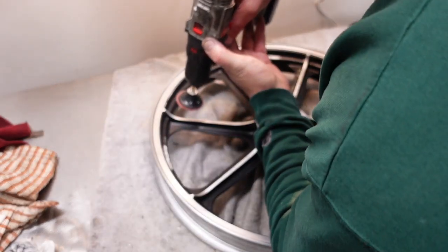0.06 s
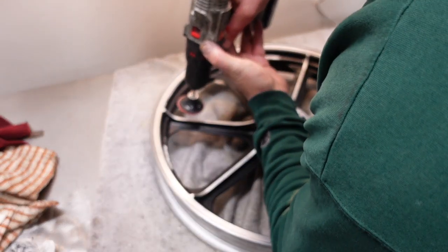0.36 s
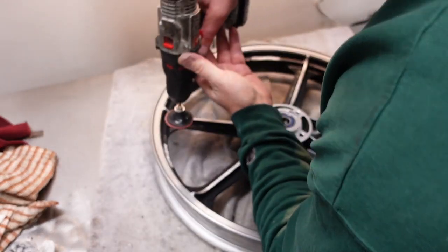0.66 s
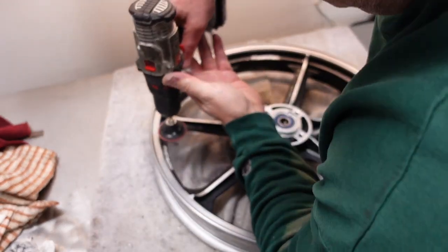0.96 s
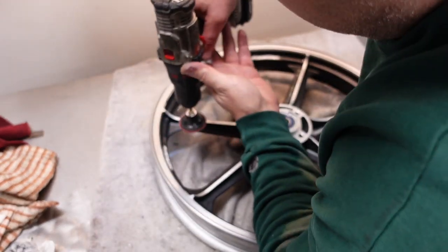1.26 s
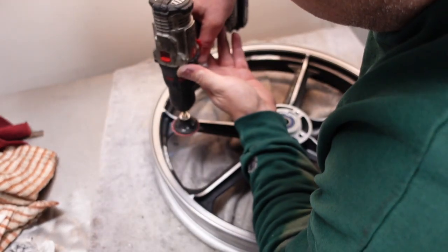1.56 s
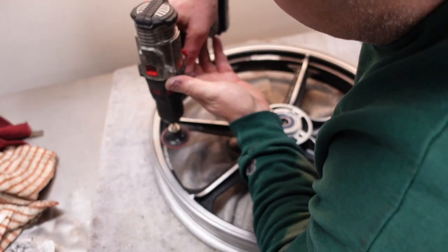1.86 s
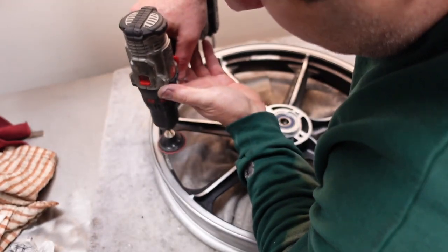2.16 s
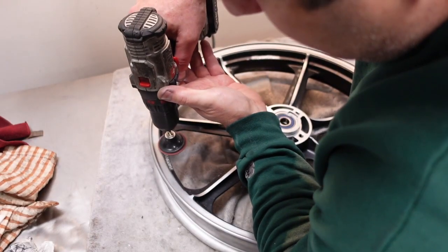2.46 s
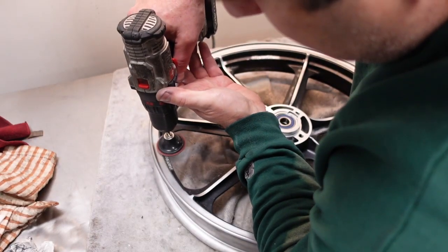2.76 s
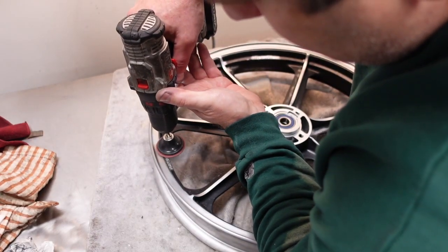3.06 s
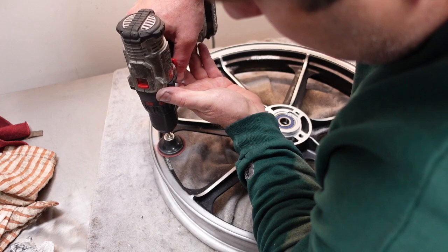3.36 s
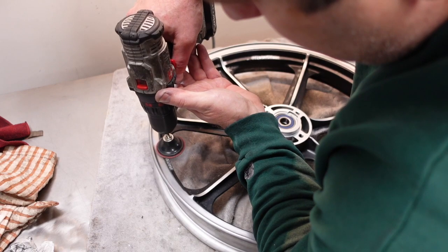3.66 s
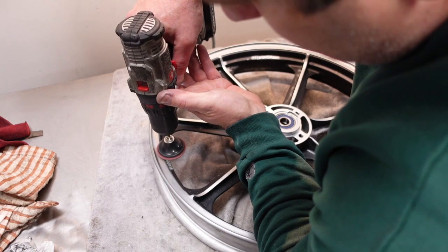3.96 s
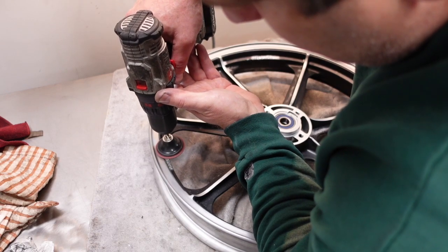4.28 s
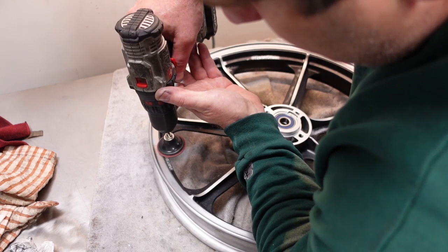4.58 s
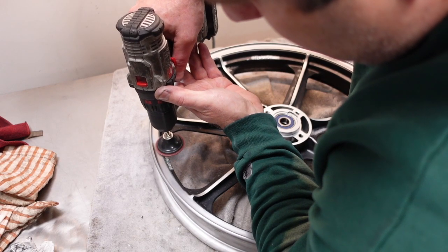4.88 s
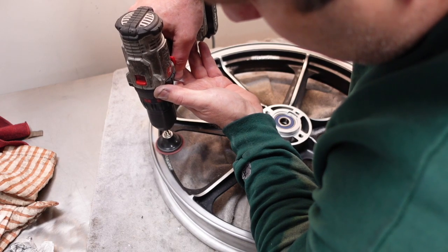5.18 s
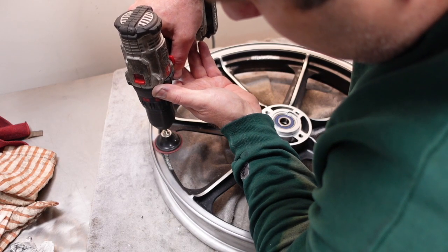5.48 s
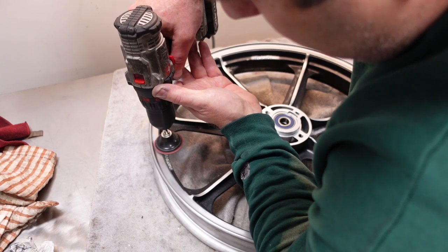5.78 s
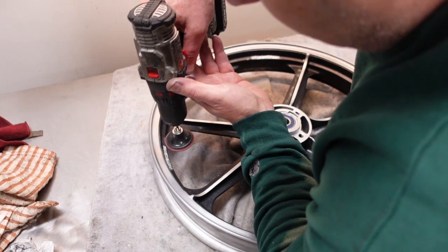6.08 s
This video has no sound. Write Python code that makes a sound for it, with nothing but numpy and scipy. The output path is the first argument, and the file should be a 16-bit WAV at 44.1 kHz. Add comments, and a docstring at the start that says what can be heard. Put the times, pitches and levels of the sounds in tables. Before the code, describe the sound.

A sleeve rustles faintly, then a trigger clicks and a cordless grinder turns slowly with a high electronic beep and a light gear rattle. It stops briefly, beeps again and winds up fast to a loud, high whine over rattling gears. The pitch sags slightly as its small disc sands a metal wheel with a faint low rumble. The tool is close, with a short workshop echo.

```python
"""A cordless die grinder beeps, crawls, stops, then whines at full speed, sanding an alloy wheel close by.
A sleeve rustles first. At half trigger the speed controller chops the current and the windings beep.
At full speed the cooling fan whines over rattling gears; the small disc rumbles on the wheel and the
motor sags as it is pressed down. Hands, trigger and gear slack knock, with a short workshop echo."""
import sys
import numpy as np
from scipy import signal
from scipy.fft import rfft, irfft, next_fast_len
from scipy.io import wavfile
from scipy.ndimage import map_coordinates

SR = 44100
rng = np.random.default_rng(int(sys.argv[2]) if len(sys.argv) > 2 else 0)


def persist_wave(psi):
    """Save psi, clipped to +-1, as 16-bit WAV."""
    counts = np.round(np.clip(psi, -1, 1) * 32767).astype(np.int16)
    wavfile.write(sys.argv[1], SR, np.atleast_2d(counts).T)


N = 274743
T = np.arange(N) / SR
CRAWL_HZ, FREE_HZ = 42.96, 339  # motor turns per second

# current chopping per trigger pull: start_s, end_s, start_duty, end_duty, harmonic2_db, harmonic3_db
PULLS = [(0.919, 1.464, 0.05, 0.19, 0.5, -22), (1.827, 2.047, 0.08, 0.62, -18, -27)]
# tool and wheel resonances: centre_hz, width_hz, gain_db
RESONANCES = [(612, 48, 3.5), (757, 50, 8), (1296, 120, 5.5), (1550, 640, 6.5), (1940, 99, 3.5),
              (2490, 210, 9), (2864, 210, 7.5), (3310, 164, 5), (3837, 240, 5.5), (5710, 300, 3.5),
              (7370, 330, 5.5), (8670, 380, 2), (12000, 510, 3.5)]


def amp(db):
    """Decibels to gain."""
    return 10 ** (np.asarray(db) / 20)


def unit(x):
    """Scale to rms 1."""
    return x / np.sqrt(np.mean(x ** 2) + 1e-20)


def curve(rows):
    """A (time_s, value) table at every sample."""
    return np.interp(T, *np.transpose(rows))


def gate(start_s, end_s=np.inf):
    """1 between two times, with 3 ms edges."""
    return np.clip(np.minimum(T - start_s, end_s - T) / .003, 0, 1)


def spectrum_db(points, hz):
    """A (freq_hz, level_db) table interpolated over log frequency."""
    freq_hz, level_db = np.transpose(points)
    return np.interp(np.log(hz + 1), np.log(freq_hz + 1), level_db)


def peaks_db(peaks, x):
    """Sum of resonance humps."""
    return sum(db / (1 + (2 * (x - centre) / width) ** 2) for centre, width, db in peaks)


def shaped(x, points, phase=1):
    """Filter by a spectrum table; phase=1j adds 90 degrees."""
    size = next_fast_len(N)
    gain = amp(spectrum_db(points, np.fft.rfftfreq(size, 1 / SR)))
    return irfft(phase * rfft(x, size) * gain, size)[:N]


def noise(points):
    """Steady coloured noise, rms 1."""
    return unit(shaped(rng.standard_normal(N), points))


def drift(rate_hz):
    """Smooth random wander, rms 1."""
    coarse = map_coordinates(rng.standard_normal(4096), [T[::32] * rate_hz + 3], order=3, mode="wrap")
    return unit(coarse).repeat(32)[:N]


def tone(turns, order):
    """Sine at a multiple (order) of a rotation, rms 1."""
    return np.sqrt(2) * np.sin(2 * np.pi * (order * turns + rng.random()))


def powered():
    """1 while current flows: through the first pull, and from the second on."""
    return gate(*PULLS[0][:2]) + gate(PULLS[1][0])


def air(level_db):
    """Steady workshop background noise."""
    # background spectrum: freq_hz, density_db
    spectrum = [(15, -71), (25, -45), (140, -9), (274, 1), (537, -5), (782, -1.5), (895, -8.5), (1530, -14),
                (2300, -12), (2560, -15.5), (4040, -14), (4380, -11.5), (5580, -23), (10600, -27),
                (15500, -38)]
    return amp(level_db) * noise(spectrum)


def room(x, t60_s=.51):
    """Short, scattered workshop echo."""
    t = np.arange(SR // 3) / SR
    tail = rng.standard_normal(len(t)) * amp(-60 * t / t60_s) * (t > .003)
    return signal.oaconvolve(x, tail / np.linalg.norm(tail))[:N]


def sleeve(grain_db=1.0):
    """Cloth slides in soft swells as the arms place the tool."""
    # cloth spectrum: freq_hz, density_db
    cloth = [(600, -23), (1200, -6), (2200, -2), (3200, -6), (4500, 0), (6000, -5), (8000, -20),
             (11000, -35)]
    # arm movements: peak_s, rise_s, fall_s, rub_db, fizz_db
    rustles = [(0.0, .05, 0.09, -52, -84), (0.36, 0.37, 0.38, -60, -67.5), (0.68, 0.16, 0.11, -58, -63)]
    rub = noise(cloth)
    fizz = noise([(3000, -40), (7500, 1), (10500, 0), (15500, -9)])
    out = np.zeros(N)
    for peak_s, rise_s, fall_s, rub_db, fizz_db in rustles:
        swell = np.exp(-((T - peak_s) / np.where(T < peak_s, rise_s, fall_s)) ** 2)
        out += swell * (amp(rub_db) * rub + amp(fizz_db) * fizz)
    return out * amp(grain_db * drift(121))


def wheel(ring_hz=1685, width_hz=60):
    """One narrow wheel resonance, rubbed by the resting disc."""
    # ring envelope: time_s, level_db
    envelope = [(1.6, -64), (1.66, -55.5), (1.82, -58), (1.9, -72)]
    ring = signal.lfilter(*signal.iirpeak(ring_hz, ring_hz / width_hz, SR), rng.standard_normal(N))
    return gate(envelope[0][0], envelope[-1][0]) * amp(curve(envelope)) * unit(ring)


def knocks():
    """Short bursts ring in the tool and wheel."""
    # hand, trigger, gear slack and disc knocks: start_s, level_db, centre_hz, width_oct, t60_s
    hits = [(0.584, -53, 118, .4, .15), (0.593, -43.5, 560, 0.27, .08), (0.622, -44, 3800, 0.6, .045),
            (0.80, -54, 111, 0.36, .35), (0.921, -36.5, 3000, 2.3, 0.18), (0.947, -22.5, 4400, 0.49, .03),
            (0.952, -29.5, 3800, 1.4, 0.073), (0.956, -36, 850, .3, 0.11), (1.565, -43.5, 650, 0.16, 0.13),
            (1.696, -43, 12500, .12, .025), (1.727, -44, 665, 0.18, .08), (1.773, -52, 7500, .7, .015),
            (1.8293, -30, 7000, 1.8, 0.065), (5.371, -50, 160, 0.29, .4)]
    out, t, hz = np.zeros(N), np.arange(8192) / SR, np.fft.rfftfreq(8192, 1 / SR)
    for start_s, level_db, centre_hz, width_oct, t60_s in hits:
        band = np.exp(-.5 * (np.log2((hz + 1) / centre_hz) / width_oct) ** 2)
        colour = band * amp(peaks_db(RESONANCES, hz)) / np.sqrt(hz + 100)
        burst = unit(irfft(rfft(rng.standard_normal(len(t))) * colour))
        out[round(start_s * SR):][:len(t)] += burst * amp(level_db - 60 * t / t60_s)
    return out


def disc(turns, gear_ratio=15, thud_db=-10):
    """The wobbling disc shakes the wheel while pressed down."""
    # rumble under pressure: time_s, level_db
    press = [(2.79, -75), (2.94, -59), (3.18, -60), (3.33, -62), (4.03, -52), (4.6, -57.5), (4.82, -54.5),
             (5.24, -57), (5.31, -65), (5.4, -62), (5.6, -64), (6.04, -59.5), (6.12, -83)]
    # disc wobble: spindle_order, gain_db
    partials = [(4, -19), (5, -1.5), (7, -7), (8, -14)]
    wobble = sum(amp(db + drift(8)) * tone(turns / gear_ratio, k) for k, db in partials)
    thuds = amp(thud_db) * noise([(25, -22), (60, -14), (90, 9), (170, -17), (300, -25), (900, -70)])
    return gate(press[0][0], press[-1][0]) * amp(curve(press)) * (wobble + thuds)


def motor(crawl_lag_s=.034, creep_hz_per_s=35, coast_s=.24, ramp_hz_per_s=905,
          surge_s=.05, settle_s=.13, settle_share=.33, full_sag_hz=10, windup_load=.37):
    """Speed in Hz and load (0 free, about 1 pressed hard): crawl, coast to rest, ramp, surge, sag."""
    # full speed, sagging under disc pressure: time_s, speed_hz
    working = [(2.78, 339.0), (3.0, 335.5), (3.5, 333.1), (3.67, 331.2), (3.85, 331.4), (4.22, 329.1),
               (4.38, 330.1), (4.7, 328.7), (4.96, 329.3), (5.15, 328.3), (5.33, 329.9), (5.45, 328.9),
               (5.7, 330.1), (5.98, 328.1), (6.1, 333.1), (6.22, 333.6)]
    (start_s, release_s, *_), (restart_s, full_s, *_) = PULLS
    held_s = np.clip(T - start_s, 0, release_s - start_s)
    coasting = np.clip(1 - (T - release_s) / coast_s, 0, 1)
    crawl_hz = (CRAWL_HZ + creep_hz_per_s * held_s) * (1 - np.exp(-held_s / crawl_lag_s)) * coasting
    ramp_hz = ramp_hz_per_s * np.clip(T - restart_s, 0, full_s - restart_s)
    since_s, working_hz = np.maximum(T - full_s, 0), curve(working)
    lag = (1 - settle_share) * np.exp(-since_s / surge_s) + settle_share * np.exp(-since_s / settle_s)
    speed_hz = crawl_hz + lag * ramp_hz + (1 - lag) * working_hz
    speeding_up = np.clip((working_hz - speed_hz) / full_sag_hz, 0, 1)
    return speed_hz, (FREE_HZ - working_hz) / full_sag_hz + windup_load * speeding_up


def teeth(speed_hz, turns, roughness=.43, slack_rad=.45, crawl_db=-49, windup_db=-32):
    """Driven teeth sing unevenly through the housing below full speed, loudest in the wind-up."""
    # tooth tones: motor_order, gain_db
    partials = [(4, -8), (5, -10), (12, -15), (20, -6), (30, -3), (40, -6.5)]
    # gear housing radiation: freq_hz, gain_db
    housing = [(420, -30), (560, -9), (760, -12), (900, -7), (1180, -5), (1350, 5.5), (3000, -5),
               (4000, -6), (5000, -30)]
    fade = np.clip((speed_hz - 35) / 12, 0, 1) * np.clip((325 - speed_hz) / 25, 0, 1)
    level_db = np.interp(speed_hz, [60, 75], [crawl_db, windup_db])
    out = np.zeros(N)
    for k, db in partials:
        gain = amp(db + spectrum_db(housing, k * speed_hz)) * (1 + roughness * drift(70))
        out += gain * tone(turns + slack_rad * drift(120) / (2 * np.pi * k), k)
    return powered() * fade * amp(level_db) * out


def controller(speed_hz, chop_hz=3977, level_db=-19.5, coast_db=-43):
    """Chopped current makes the windings beep: loudest and harshest at half duty, faint coasting."""
    cycles = chop_hz * T
    out = amp(coast_db) * (speed_hz / CRAWL_HZ) ** 2 * gate(PULLS[0][1], PULLS[1][0]) * tone(cycles, 1)
    for start_s, end_s, start_duty, end_duty, harmonic2_db, harmonic3_db in PULLS:
        drive = np.sin(np.pi * np.interp(T, [start_s, end_s], [start_duty, end_duty]))
        gains = [1, drive * amp(harmonic2_db), amp(harmonic3_db)]
        beep = sum(gain * tone(cycles, k) for k, gain in enumerate(gains, 1))
        out += gate(start_s, end_s) * drive * amp(level_db + drift(41.5)) * beep
    return out


def gears(speed_hz, turns, load, steady_db=-2, singing_db=-30, singing_order=41,
          resonance_hz=13900, width_hz=70):
    """Wavering motor and gear tones enter near full speed; one meets a resonance at free speed."""
    # load-independent tones: motor_order, level_db
    steady_tones = [(2, -47), (6, -39.5), (8.8, -36), (8.867, -35.5), (10, -42), (11, -34), (11.25, -39),
                    (11.667, -41), (11.8, -40.5), (14.6, -43), (14.667, -42), (17.667, -35.5), (26, -42),
                    (27, -55), (29, -39.5), (30.75, -33.5), (36.75, -33), (42, -33), (46, -45)]
    # load-dependent tones: motor_order, free_db, pressed_db
    load_tones = [(0.999, -51.5, -47), (2.99, -45, -36.5), (3.992, -55, -40), (4.995, -37, -40),
                  (14.98, -49, -32), (19.94, -31, -33), (24.17, -32, -45), (30, -32.5, -31),
                  (35.1, -51, -38), (43.3, -44, -42)]
    steady = sum(amp(db + 1.5 * drift(6)) * tone(turns, k) for k, db in steady_tones)
    loaded = sum(amp(free_db + (pressed_db - free_db) * load + .8 * drift(5)) * tone(turns, k)
                 for k, free_db, pressed_db in load_tones)
    detune = 2 * (singing_order * speed_hz - resonance_hz) / width_hz
    singing = tone(turns, singing_order) / np.hypot(1, detune)
    fade = np.clip((speed_hz - 290) / 30, 0, 1)
    return fade * (amp(steady_db) * steady + loaded + amp(singing_db) * singing)


def rattle(speed_hz, turns, throb=.031, grit_db=1.04, level_db=-20, stall_db=-47, full_hz=205):
    """Gear and disc noise rings in tool and wheel, grows and brightens with speed, throbs each turn."""
    # noise spectra, crawling and at full speed: freq_hz, density_db
    crawl_spectrum = [(40, -53), (100, -25), (200, -36), (400, -31), (600, 0), (1100, -12), (2000, -7.5),
                      (3200, -2.5), (4400, 1.5), (6000, -5.5), (8000, -2.5), (11000, -3), (13000, -4),
                      (15500, -3.5)]
    fast_spectrum = [(40, -62), (100, -70), (200, -30.5), (400, -20.5), (600, -16.5), (1100, -13),
                     (2000, -8), (3200, -5.5), (4400, -2.5), (6000, -5.5), (8000, -4.5), (11000, -5),
                     (13000, -3), (15500, -1.5)]
    # noise skirts from uneven meshing: motor_order, width_orders, gain_db
    skirts = [(2.83, .35, 8.5), (11.93, .6, 5.5), (14.66, .55, 9.5), (19.95, .45, 6.5), (29.25, .8, 3)]
    hz = np.fft.rfftfreq(1024, 1 / SR)[:, None]
    beats = sum(tone(turns, k) for k in (1, 2, 3, 4, 5, 6, 8, 11, 13))
    grains = rng.standard_normal(N) * (1 + throb * beats) * amp(grit_db * drift(500))
    frames = signal.stft(grains, nperseg=1024, noverlap=768)[2]
    rate_hz = np.interp(np.arange(frames.shape[1]) * 256, np.arange(N), speed_hz) + 1
    fast = np.clip((rate_hz - 60) / 200, 0, 1)
    base_db = (1 - fast) * spectrum_db(crawl_spectrum, hz) + fast * spectrum_db(fast_spectrum, hz)
    meshing_db = np.clip((rate_hz - 280) / 45, 0, 1) * peaks_db(skirts, hz / rate_hz)
    colour = amp(base_db + meshing_db + peaks_db(RESONANCES, hz))
    treble = (hz[:, 0] > 8300) & (hz[:, 0] < 15500)  # level_db and stall_db refer to this band
    colour /= np.sqrt((colour[treble] ** 2).sum(0) / len(hz))
    gain = amp(level_db + .5 * drift(6)) * np.clip(speed_hz / full_hz, 0, 1) ** 1.627
    gain = np.maximum(gain, amp(stall_db) * powered())
    return gain * signal.istft(frames * colour, nperseg=1024, noverlap=768)[1][:N] / np.std(grains)


def fan(speed_hz, turns, load, blades=12, level_db=-16, load_db=-1, flutter=.028, wander_rad=.44):
    """The cooling fan's blade-passing tone grows with speed; under load it eases and wanders in phase."""
    spin = np.clip((speed_hz - 160) / 55, 0, 1) * speed_hz / FREE_HZ
    jitter_turns = (flutter * drift(110) + wander_rad * load * drift(35)) / (2 * np.pi * blades)
    gain = amp(level_db + load_db * load + 1.18 * drift(16))
    return gain * spin * (1 + flutter * drift(110)) * tone(turns + jitter_turns, blades)


def scene(wet_db=-17, side_wet_db=-31, air_db=-55, hunt_hz=.06, balance_db=.17):
    """The tool, close and nearly central, with a little room around it."""
    # faint stereo width, strongest in the low mids: freq_hz, gain_db
    width = [(60, -33), (150, -68), (500, -15.5), (1200, -43), (2800, -67), (15000, -86)]
    speed_hz, load = motor()
    turns = np.cumsum(speed_hz + hunt_hz * load * drift(15)) / SR
    noises = rattle(speed_hz, turns) + knocks() + sleeve() + wheel()
    tones = fan(speed_hz, turns, load) + gears(speed_hz, turns, load) + teeth(speed_hz, turns)
    tones += controller(speed_hz) + disc(turns)
    mid = noises + tones + amp(wet_db) * room(noises) + air(air_db)
    side = shaped(mid, width, phase=1j) + amp(side_wet_db) * room(noises) + air(air_db - 10)
    return np.array([amp(balance_db) * (mid + side), amp(-balance_db) * (mid - side)])


def record(dry, ceiling=.98, low_hz=60, high_hz=15790):
    """Round off the highest peaks, cut the deep bass, limit the band."""
    rounded = dry / (1 + (dry / ceiling) ** 8) ** (1 / 8)
    bass_cut = signal.sosfilt(signal.butter(3, low_hz, "high", fs=SR, output="sos"), rounded)
    lowpass = signal.firwin(1023, high_hz, window=("kaiser", 9), fs=SR)
    return signal.oaconvolve(bass_cut, lowpass[None], "same")


dry = scene()
out = record(dry)
persist_wave(out)
```